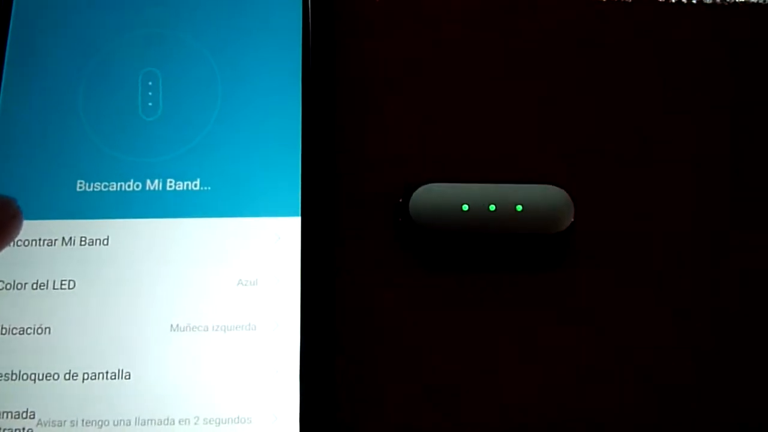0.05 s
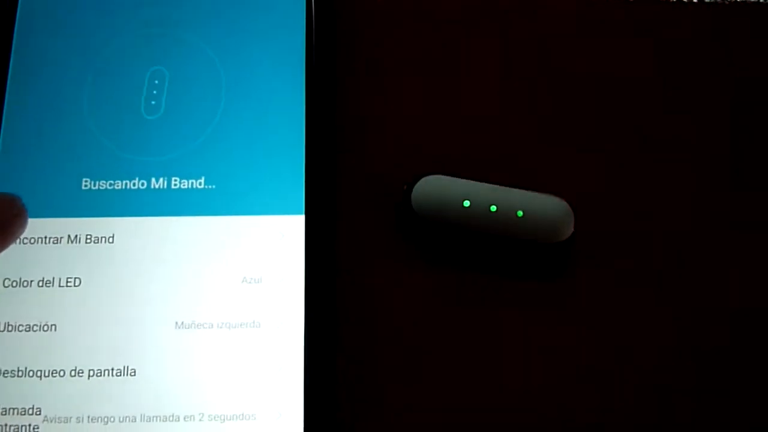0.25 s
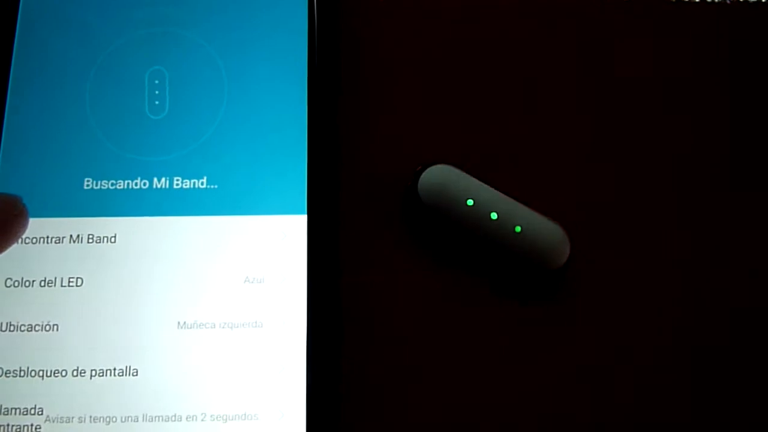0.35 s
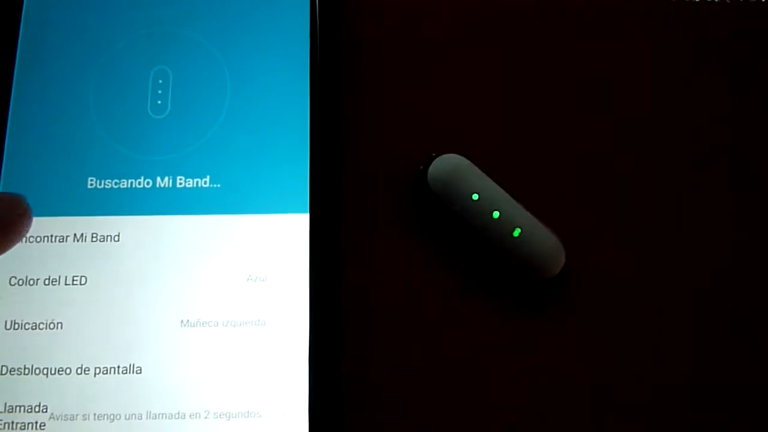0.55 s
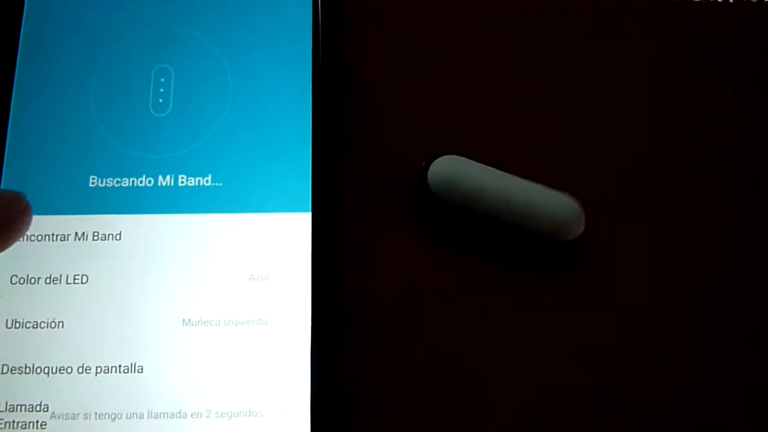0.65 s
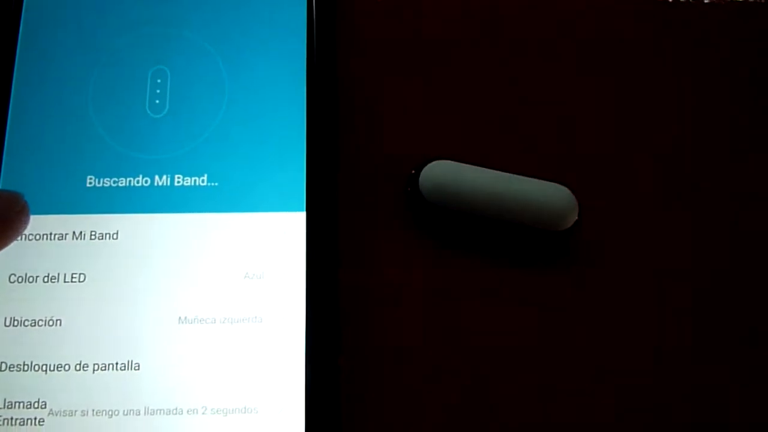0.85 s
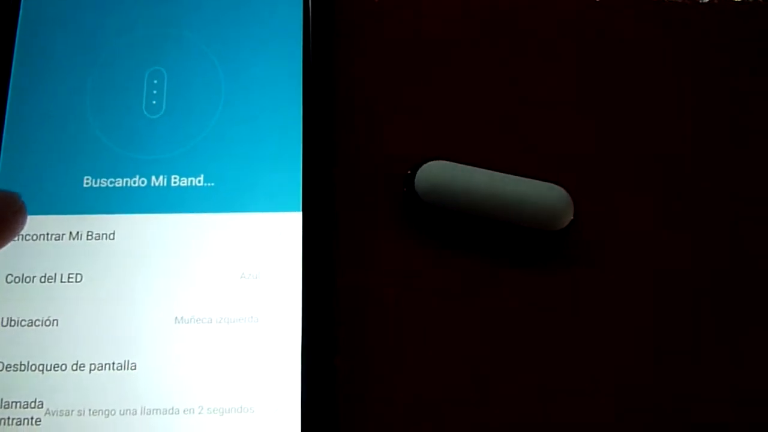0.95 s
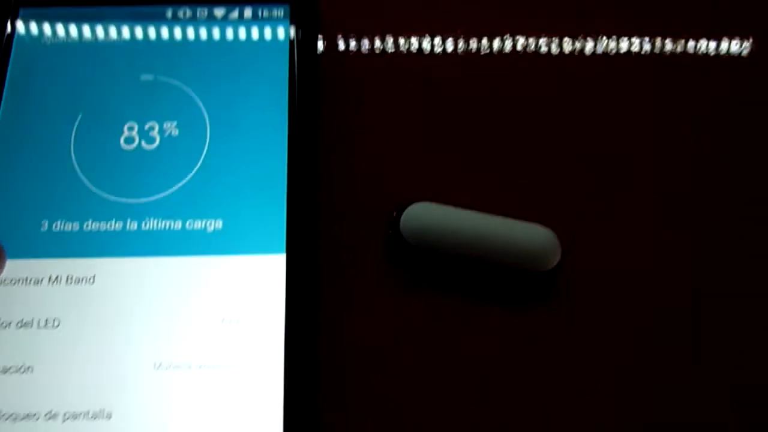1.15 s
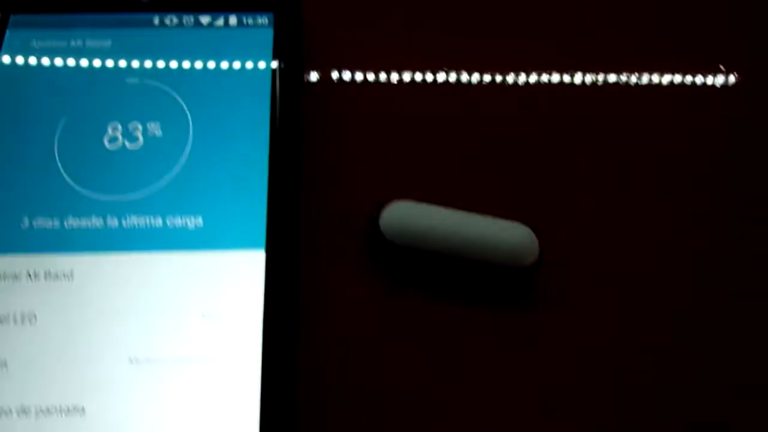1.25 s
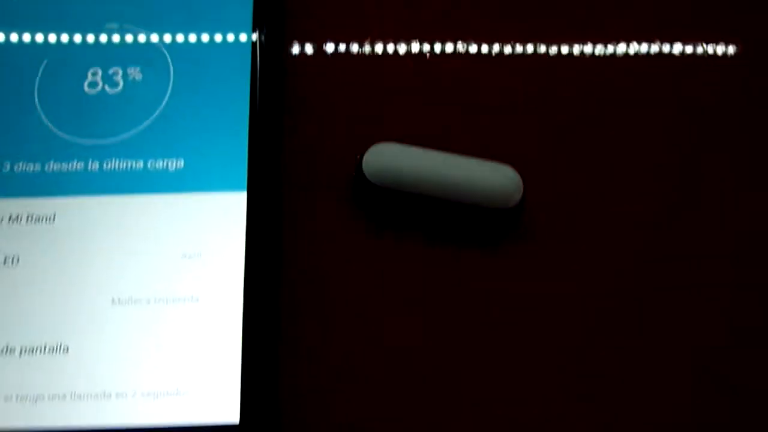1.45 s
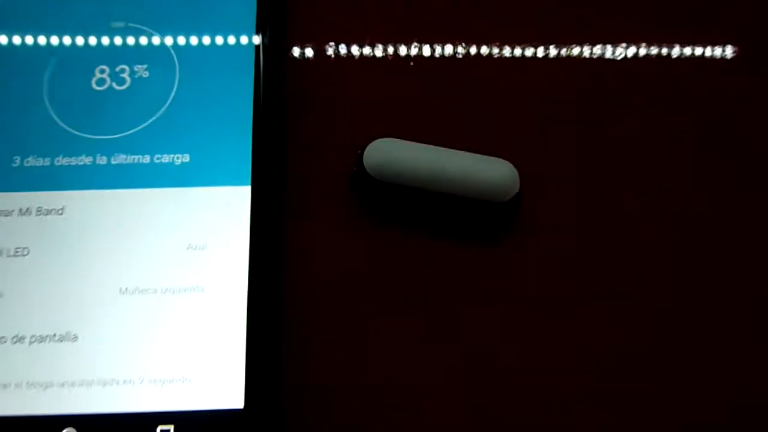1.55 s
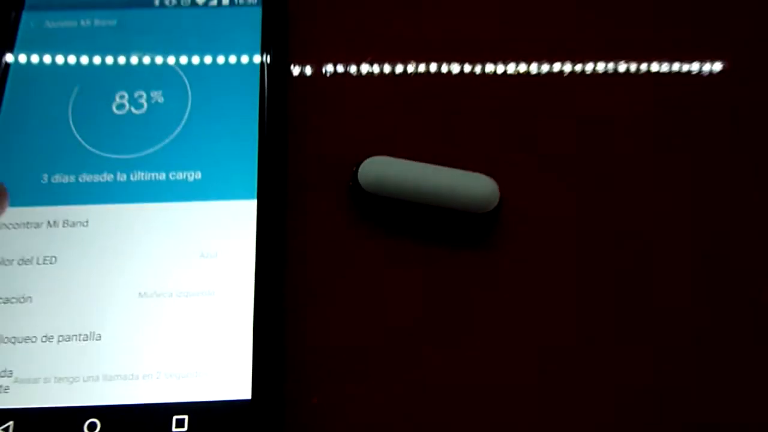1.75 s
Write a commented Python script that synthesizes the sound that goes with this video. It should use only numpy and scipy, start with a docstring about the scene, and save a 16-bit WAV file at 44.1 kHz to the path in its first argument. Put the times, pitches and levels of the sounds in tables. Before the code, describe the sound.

In a quiet room with a faint electrical hum, a little vibrating gadget gives one brief, rattling buzz against a hard tabletop and slows to dull taps. A faint bump and rustle follow close to the microphone.

```python
"""A small plastic capsule with a vibration motor buzzes once on a hard table, for half a second.
Its off-centre weight makes it chatter on every turn and break into short runs of hard hops; each
contact clacks and rings the tabletop and the shell. The motor coasts down into soft, dull taps.
Heard in stereo in a quiet room, with faint handling noise close to the microphone
and a mains hum in the background."""
import sys
import numpy as np
from scipy import signal
from scipy.fft import rfft, irfft
from scipy.io import wavfile

SR = 44100
rng = np.random.default_rng(int(sys.argv[2]) if len(sys.argv) > 2 else 0)


def master(y):
    """Save y as 16-bit WAV."""
    cut = np.clip(np.atleast_2d(y).T, -1, 1)
    pcm = np.round(cut * 32767)  # scale
    wavfile.write(sys.argv[1], SR, pcm.astype(np.int16))


N = 79380

# Stereo image of the capsule at the microphone: f/Hz, left minus right/dB
BUZZ_IMAGE = [(200, -1.5), (900, 1), (1700, 1.7), (2500, -5.5), (3100, 5.5), (3750, -10.5), (4900, 9.5),
              (6800, 2.5), (9000, -3), (11000, 2.5), (12400, 3.5), (15000, -2)]
def capsule_buzz():
    """Every contact clacks, rings the tabletop and the shell, and dies away in the room."""
    force = -contact_force(chatter()) - contact_force(hops())
    sound = shell_clack(force) + table_and_shell_modes(force) + dense_ring(force)
    pan = np.sqrt(gains(BUZZ_IMAGE, N))
    return irfft(rfft(sound) * np.array([pan, 1 / pan]), N)


# Turning rate of the motor, spinning up and coasting down: t/s, f/Hz
MOTOR_SPEED = [(.19, 100.1), (.235, 133.8), (.29, 150), (.35, 165.1), (.43, 178.2), (.5, 184), (.6, 180.2),
               (.64, 159.9), (.71, 115.1)]
# Light contacts on the table: t/s, level/dB, sharpness f/Hz
LIGHT_CONTACTS = [(.19, -19, 910), (.214, -10.5, 1200), (.236, -3, 2800), (.32, -2.5, 3700),
                  (.385, -4, 2830), (.44, -4.5, 3640), (.505, -3, 3030), (.531, -4.5, 2420),
                  (.56, -2, 4040), (.622, -5, 3330), (.642, -9.5, 1690), (.664, -4, 1702), (.688, -20, 900),
                  (.71, -26, 700)]
# Contacts within one turn as the capsule rocks: phase/turns, level/dB
ROCKING_CONTACTS = [(0.0, 1), (0.361, -3), (0.659, -8)]
def chatter(lift_db=1, scatter_db=2.5, jitter_s=.0005):
    """The off-centre weight rocks the capsule into light, uneven contacts, three to a turn."""
    t = np.arange(MOTOR_SPEED[0][0], MOTOR_SPEED[-1][0], 1 / SR)
    turns = np.cumsum(curve(MOTOR_SPEED, t)) / SR
    for turn in range(int(turns[-1])):
        for phase, rock_db in ROCKING_CONTACTS:
            late, hard = rng.standard_normal(2)
            at = np.interp(turn + phase, turns, t) + jitter_s * late
            db = lift_db + rock_db + curve(LIGHT_CONTACTS, at) + scatter_db * hard
            yield at, db, curve(LIGHT_CONTACTS, at, col=2)


# Runs of hard hops on the table: start t/s, length/s, hop rate f/Hz, level/dB, sharpness f/Hz
HOP_RUNS = [(0.2371, .011, 137, -4.5, 9000), (0.2584, .037, 149, -6.5, 7500), (0.3, .022, 160, -2, 7400),
            (.3482, .027, 168, 1, 9000), (0.389, .003, 165, 0, 6000), (0.406, .003, 165, -3, 7000),
            (0.4206, .015, 169, 4.5, 8000), (.4378, .015, 168, -1.5, 6070), (0.471, .008, 190, 1.5, 6000),
            (0.4912, .014, 187, 0.5, 8000), (.5121, .003, 180, 2.5, 5500), (0.537, .013, 196, -1, 9000),
            (0.5685, .009, 163, 0.5, 7550), (0.584, .003, 170, -0.5, 6500), (0.5935, .009, 163, -1, 5930),
            (0.6128, .016, 154, -3.5, 7000)]
def hops(scatter_db=2.5):
    """The capsule leaves the table and lands hard, about once a turn, in short runs."""
    for start, length, rate_hz, db, sharp_hz in HOP_RUNS:
        for at in np.arange(start, start + length, 1 / rate_hz):
            yield at, db + scatter_db * rng.standard_normal(), sharp_hz


def contact_force(contacts, size=256):
    """Each contact is a brief push on the table: a softer one pushes for longer."""
    force = np.zeros(N)
    t = np.arange(1, size + 1) / SR
    for at, db, sharp_hz in contacts:
        push = t * np.exp(-2 * np.pi * sharp_hz * t)
        i = int(at * SR)
        force[i:i + size] += undb(db) * push / push.sum()
    return force


# Spectrum of the shell striking the table: f/Hz, relative level/dB
CLACK_SPECTRUM = [(100, -19.5), (250, -8.5), (600, -14), (800, -1), (1050, -9.5), (1700, -2), (2550, 8),
                  (3250, 3), (4100, -14.5), (5000, -3), (5800, -15.5), (7000, -10.5), (7900, -19.5),
                  (8500, -18), (10500, -21.5), (12500, -11), (15500, -28)]
def shell_clack(force, gain_db=-9):
    """The plastic shell clacks against the hard surface."""
    return undb(gain_db) * colour(force, CLACK_SPECTRUM)


# Ringing resonances of the tabletop (low) and the plastic shell (high): f/Hz, relative level/dB, T60/s
TABLE_AND_SHELL_MODES = [(276.8, -8, 0.12), (428.4, -6.5, 0.11), (472, -7, 0.082), (565, -1.5, .11),
                         (731.3, -2, 0.17), (788, -19.5, 0.13), (904, -7, 0.088), (969, -11.5, 0.093),
                         (1175.6, -12, 0.13), (1243, -9.5, 0.097), (1391.3, -5.5, 0.16), (1692, 1, 0.076),
                         (2265, -9.5, 0.13), (2490, -19, 0.17)]
def table_and_shell_modes(force, gain_db=-9):
    """The tabletop (low) and the plastic shell (high) ring in decaying modes of alternating sign."""
    t = np.arange(N) / SR
    modes = sum((-1) ** k * undb(db) * unit(np.sin(2 * np.pi * hz * t) * fade(t60))
                for k, (hz, db, t60) in enumerate(TABLE_AND_SHELL_MODES))
    return undb(gain_db) * excite(force, unit(modes))


# Spectrum of the dense ring of table and room: f/Hz, relative level/dB
RING_SPECTRUM = [(150, -31.5), (400, -1), (800, 2.5), (1080, -1), (1400, 1), (1800, 7.5), (1980, -4.5),
                 (2400, 5.5), (3100, -0.5), (3700, -5), (5000, -10), (6000, -15), (7200, -12), (7900, -24),
                 (8600, -15), (12500, -10), (15500, -20)]
def dense_ring(force, wide_hz=3150):
    """Crowded resonances die quickly in the table and more slowly in the room around it."""
    table = undb(-11.5) * unit(stereo_noise(wide_hz) * fade(t60=.041))
    room = undb(-15.5) * unit(stereo_noise(wide_hz) * fade(t60=.25))
    return colour(excite(force, table + room), RING_SPECTRUM)


# Handling at the microphone: t/s, half-width/s, thud level/dB, rustle level/dB
HANDLING_SWELLS = [(1.172, .018, -54, -72), (1.19, .06, -64, -59), (1.648, 0.0019, -70, -54.5)]
# Spectra of the thud and the rustle: f/Hz, relative level/dB
THUD_SPECTRUM = [(100, -25), (220, -12), (270, -2.5), (350, -19.5), (560, -12), (900, -34), (4000, -59)]
RUSTLE_SPECTRUM = [(200, 3), (600, 5.5), (1600, -6.5), (4000, -11), (15000, -24)]
def handling(wide_hz=2850):
    """Faint swells of thud and rustle close to the microphone."""
    t = np.arange(N) / SR
    thud = colour(stereo_noise(wide_hz), THUD_SPECTRUM)
    rustle = colour(stereo_noise(wide_hz), RUSTLE_SPECTRUM)
    sound = np.zeros((2, N))
    for at, width, thud_db, rustle_db in HANDLING_SWELLS:
        swell = np.exp(-((t - at) / width) ** 2 / 2)
        sound += swell * (undb(thud_db) * thud + undb(rustle_db) * rustle)
    return sound


# Partials of the mains hum in the room: f/Hz, level/dB
HUM_PARTIALS = [(120, -50.5), (240, -63)]
def mains_hum(waver_db=.5, waver_hz=11.9):
    """Two low mains tones whose level wavers slightly."""
    t = np.arange(N) / SR
    steps = rng.standard_normal(128)
    waver = undb(waver_db * np.interp(t * waver_hz, np.arange(len(steps)), steps))
    return waver * sum(undb(db) * np.sin(2 * np.pi * (hz * t + rng.random())) for hz, db in HUM_PARTIALS)


# Noise spectrum of the quiet room: f/Hz, relative level/dB
ROOM_SPECTRUM = [(20, -12), (55, -14.5), (80, -17.5), (130, -6.5), (170, -17), (215, -6), (280, -8),
                 (350, -16.5), (540, -14.5), (750, -21), (1100, -24.5), (2000, -32), (4000, -34.5),
                 (7300, -37), (7900, -40.5), (8600, -37.5), (13000, -38.5), (15500, -39)]
def room_tone(level_db=-53.5):
    """Steady, bass-heavy noise all around the microphone."""
    return undb(level_db) * colour(stereo_noise(wide_hz=2850), ROOM_SPECTRUM)


def stereo_noise(wide_hz):
    """Noise that is alike in both channels in the bass and grows unrelated above wide_hz."""
    mid, side = rfft(rng.standard_normal((2, N)))
    alike = .98 / (1 + (np.fft.rfftfreq(N, 1 / SR) / wide_hz) ** 2)
    mid *= np.sqrt((1 + alike) / 2)
    side *= np.sqrt((1 - alike) / 2)
    return irfft([mid + side, mid - side], N)


def undb(db):
    """Decibels to gain."""
    return 10 ** (np.asarray(db) / 20)


def curve(table, t, col=1):
    """One column of a table, joined by straight lines in time."""
    rows = np.array(table, float)
    return np.interp(t, rows[:, 0], rows[:, col])


def gains(points, size):
    """Gain of (f/Hz, level/dB) points at each frequency of a transform."""
    hz, db = np.array(points, float).T
    bin_hz = np.fft.rfftfreq(size, 1 / SR)
    return undb(np.interp(np.log(bin_hz + 1), np.log(hz), db))


def colour(x, points, size=4096):
    """Play a signal through a unit-energy filter shaped by (f/Hz, level/dB) points."""
    cepstrum = irfft(np.log(gains(points, size)))
    cepstrum[1:size // 2] *= 2  # fold onto positive time: minimum phase
    cepstrum[size // 2 + 1:] = 0
    response = irfft(np.exp(rfft(cepstrum)))
    return excite(x, unit(response))


def unit(h):
    """A response scaled to unit energy."""
    return h / np.sqrt(np.sum(h ** 2, axis=-1, keepdims=True))


def excite(x, response):
    """Play a signal through a response."""
    return signal.fftconvolve(np.atleast_2d(x), np.atleast_2d(response), axes=-1)[:, :N]


def fade(t60):
    """Exponential decay, 60 dB in t60 seconds."""
    return np.exp(-np.log(1000) * np.arange(N) / SR / t60)


def scene():
    """The capsule on its table in the quiet room, as it reaches the microphone."""
    return room_tone() + mains_hum() + handling() + capsule_buzz()


def record(dry, top_hz=15700):
    """The recorder cuts the highest treble steeply."""
    return signal.sosfilt(signal.ellip(10, .2, 80, top_hz, fs=SR, output="sos"), dry)


dry = scene()
out = record(dry)
master(out)
```